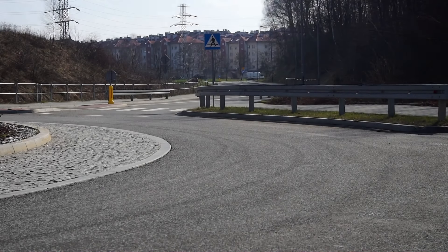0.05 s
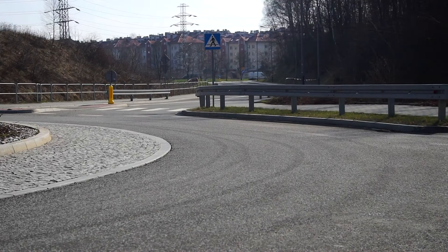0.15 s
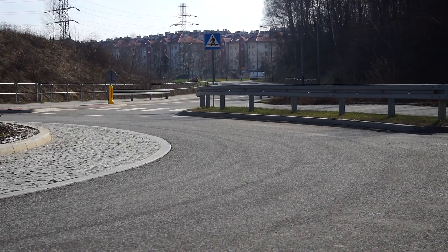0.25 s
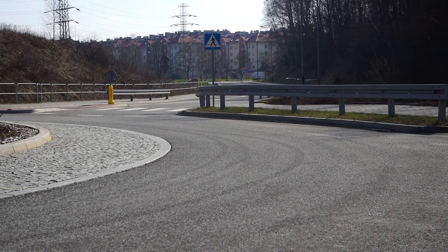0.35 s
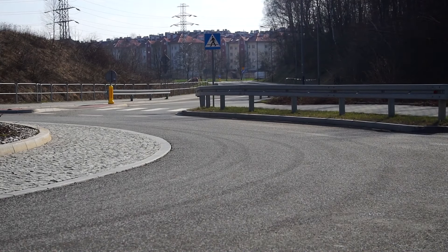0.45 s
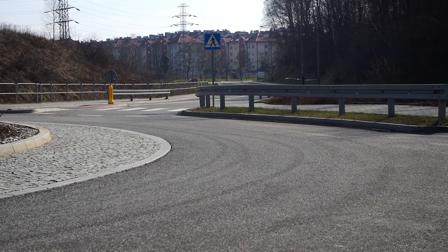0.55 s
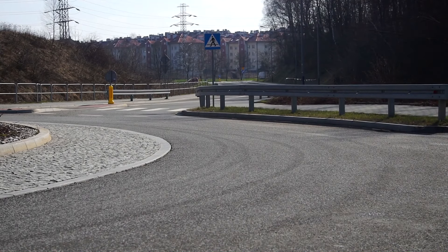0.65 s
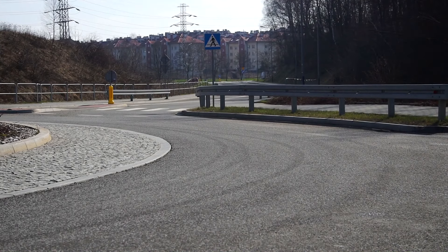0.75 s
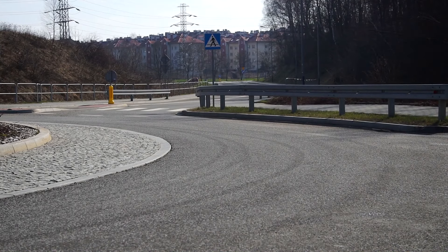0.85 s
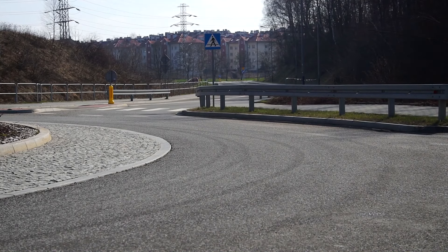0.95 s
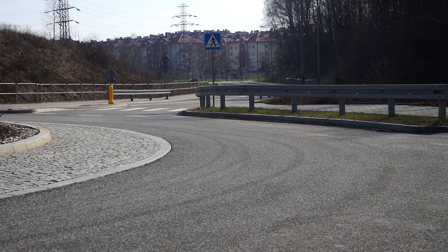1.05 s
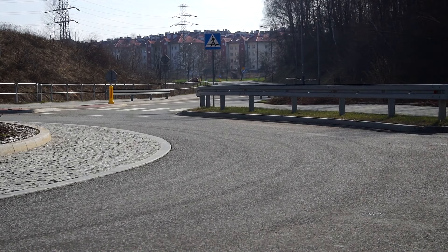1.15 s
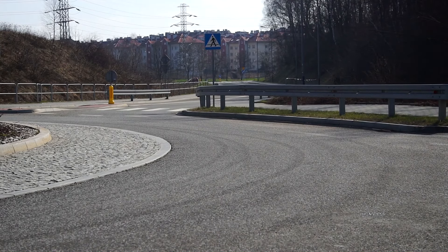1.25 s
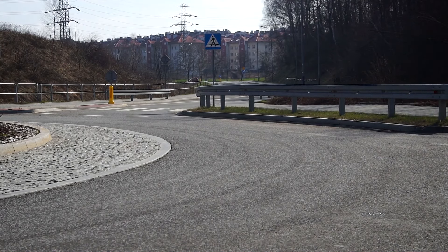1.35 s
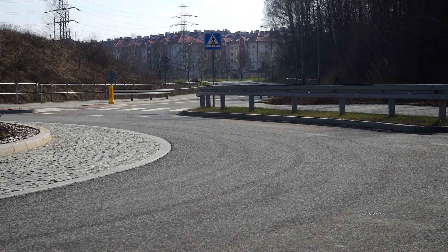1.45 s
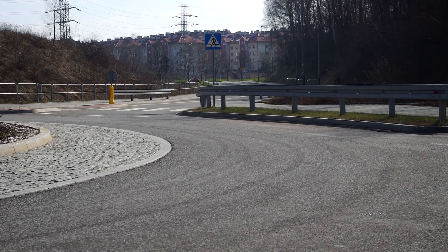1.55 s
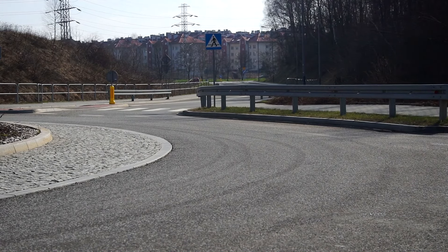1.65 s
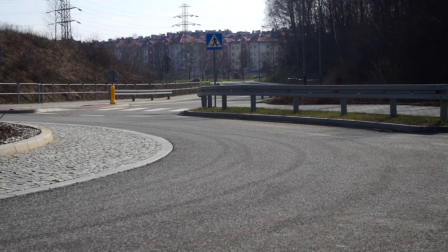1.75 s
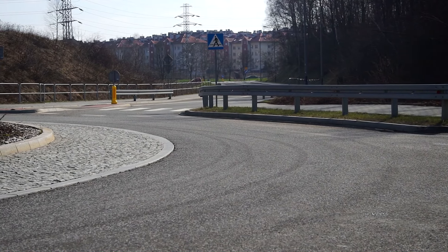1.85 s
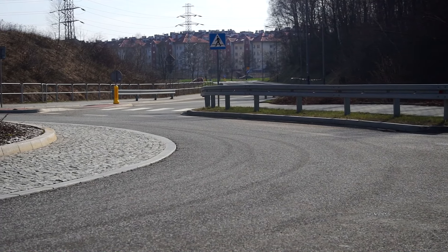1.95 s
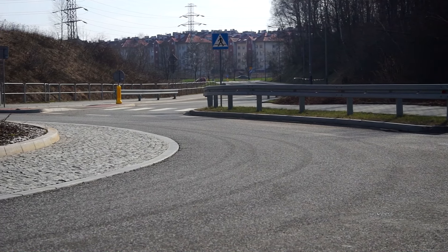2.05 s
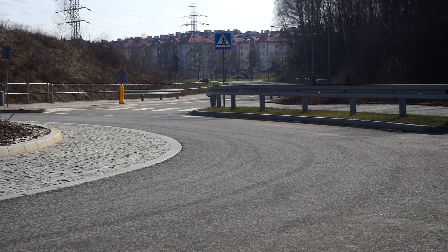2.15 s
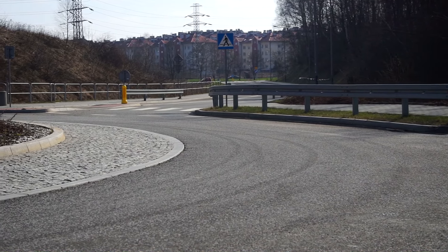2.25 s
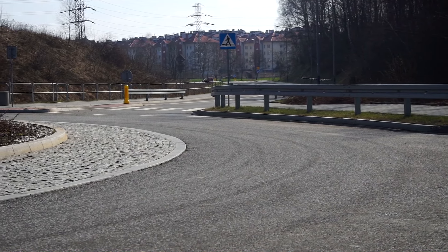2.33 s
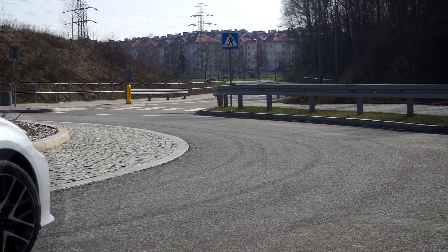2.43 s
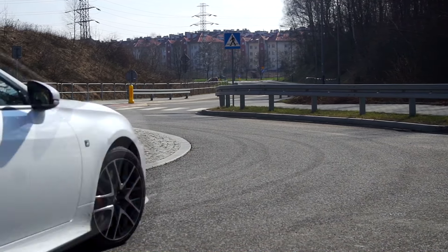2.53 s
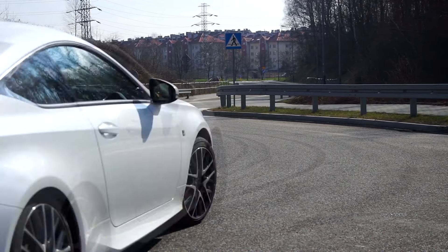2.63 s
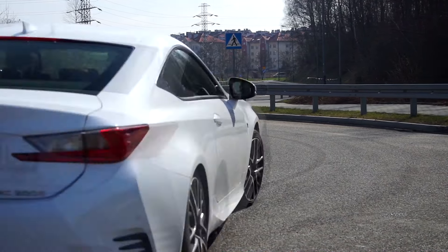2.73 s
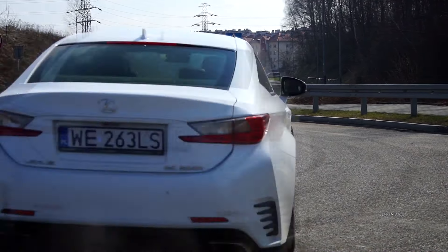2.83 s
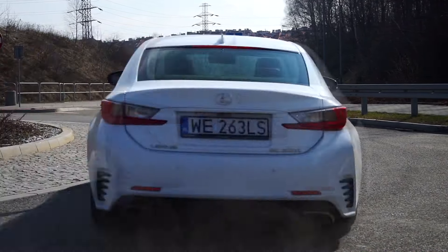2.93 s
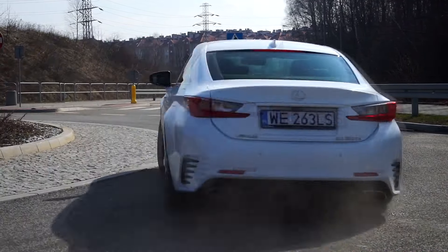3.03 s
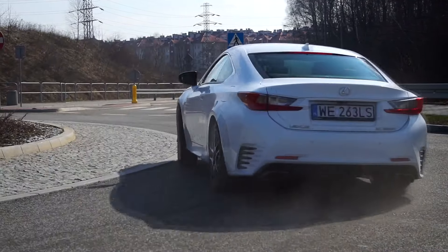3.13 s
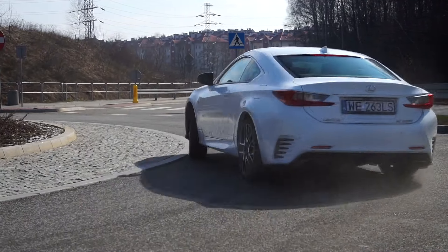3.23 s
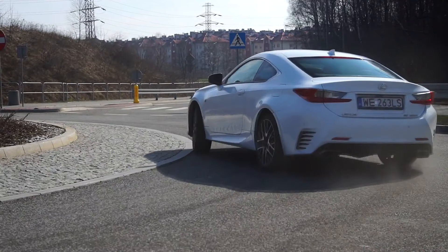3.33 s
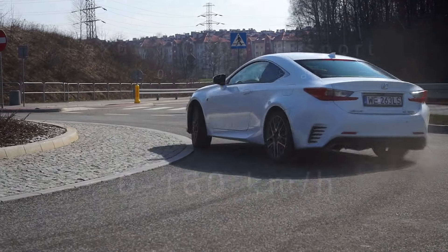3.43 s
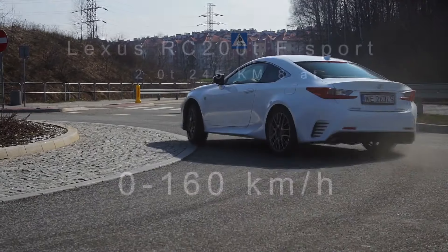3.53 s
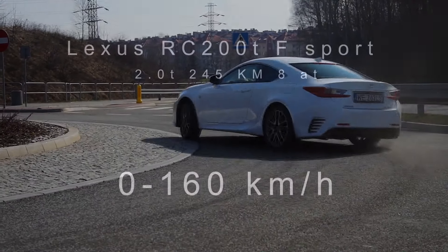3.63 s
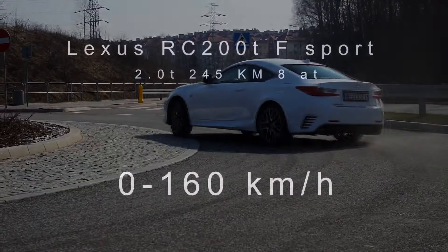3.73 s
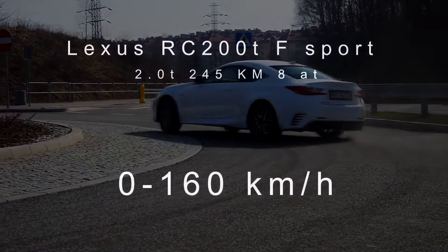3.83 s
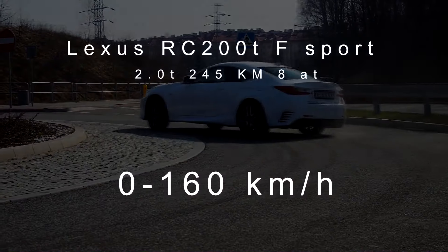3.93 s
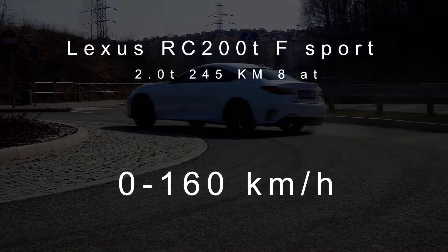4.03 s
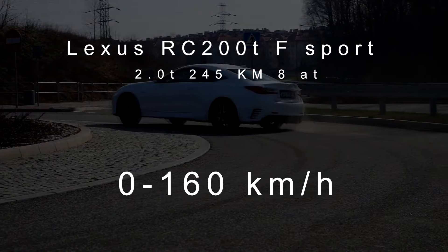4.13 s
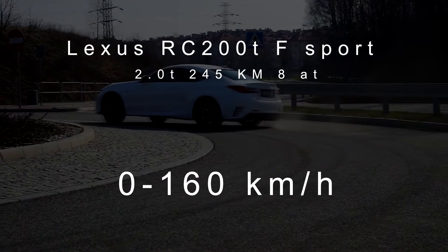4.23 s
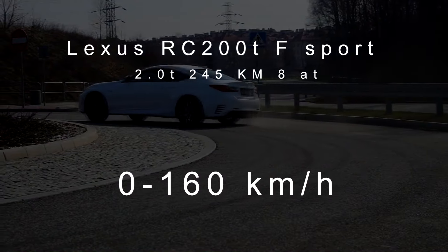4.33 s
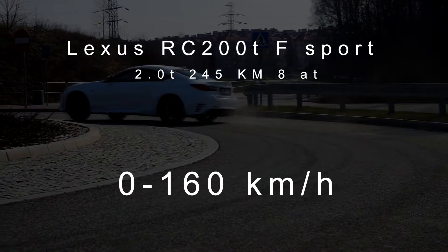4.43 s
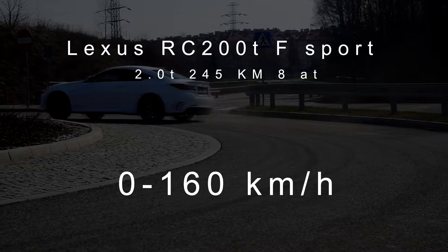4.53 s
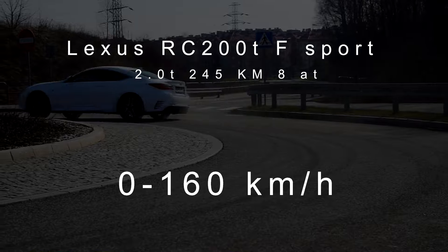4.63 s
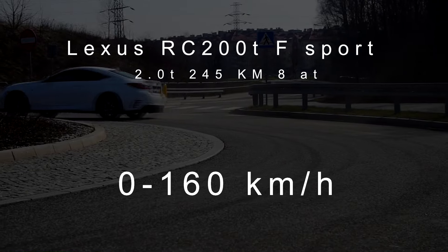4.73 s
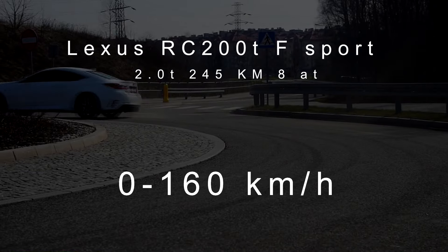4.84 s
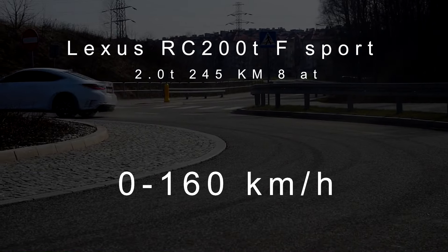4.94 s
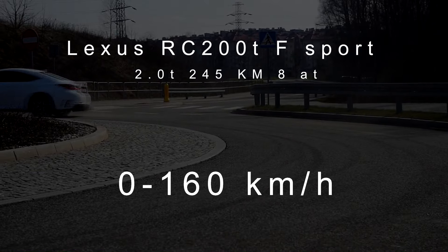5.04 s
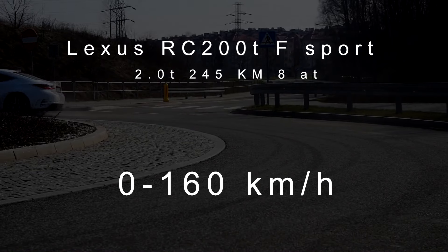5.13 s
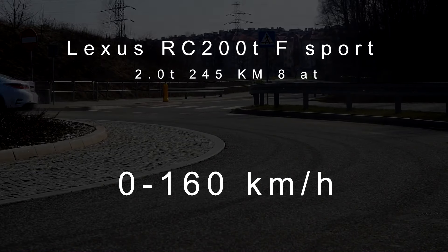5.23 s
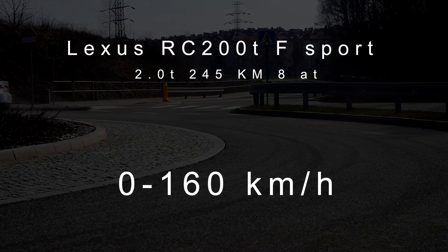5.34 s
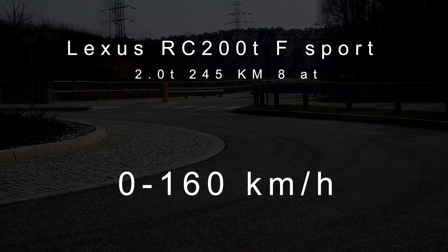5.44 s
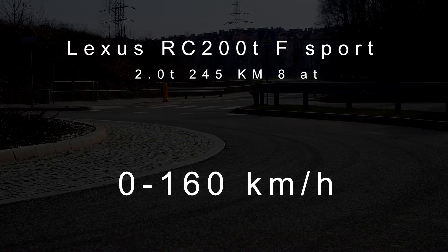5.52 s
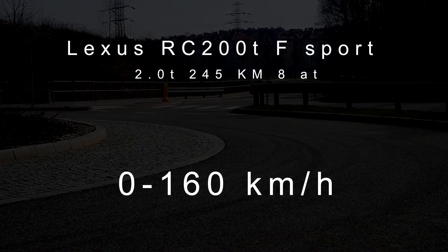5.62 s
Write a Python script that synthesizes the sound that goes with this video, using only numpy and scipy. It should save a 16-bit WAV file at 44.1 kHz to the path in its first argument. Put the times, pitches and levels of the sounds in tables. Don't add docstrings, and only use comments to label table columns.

```python
import sys
import numpy as np
from scipy import signal
from scipy.fft import rfft, irfft
from scipy.io import wavfile
from scipy.ndimage import uniform_filter1d

SR = 44100
rng = np.random.default_rng(int(sys.argv[2]) if len(sys.argv) > 2 else 0)


def master_out(mix):
    frames = np.transpose(np.atleast_2d(mix))
    ceiling = np.clip(frames, -1, 1)
    pcm = np.round(ceiling * 32767).astype(np.int16)
    wavfile.write(sys.argv[1], SR, pcm)


def gain_from_db(level_db):
    decades = np.asarray(level_db, float) / 20
    return 10 ** decades


N = 250297

# time_s, bearing (0 left of the microphone, 1 ahead)
BEARING = [(0, 0.11), (2.4, 0.009), (2.7, 0.83), (3.2, 1), (5.68, 0.9)]


def evened(x):
    return x / np.sqrt(np.mean(abs(x) ** 2) + 1e-20)


def read(points, hz):
    f, value = np.transpose(points)
    return np.interp(np.log(hz + 1), np.log(f + 1), value)


def follow(rows):
    s, *columns = np.transpose(rows)
    t = np.arange(N) / SR
    gate = np.clip(np.minimum(t - s[0] + .03, s[-1] + .03 - t) / .03, 0, 1)
    return [np.interp(t, s, c) for c in columns] + [gate]


def peaks(times, widths_s, fall):
    t = (np.arange(N) / SR - np.reshape(times, (-1, 1))) / np.reshape(widths_s, (-1, 1))
    return np.minimum(t, -t / fall)


def wander(speed_hz):
    z = rfft(rng.standard_normal(N))
    return evened(irfft(z / (1 + (np.fft.rfftfreq(N, 1 / SR) / speed_hz) ** 4), N))


def noise(spectrum, patchy_db, flicker_db):
    frames, hz = N // 128 + 5, np.fft.rfftfreq(512, 1 / SR)
    a, b, patches = rng.standard_normal((frames, 257, 3)).T
    patches = uniform_filter1d(patches, size=6, axis=0)
    patches = evened(uniform_filter1d(patches, size=24, axis=1))
    flicker = evened(uniform_filter1d(rng.standard_normal(frames), size=20))
    level_db = read(spectrum, hz)[:, None] + patchy_db * patches + flicker_db * flicker
    z = (a + 1j * b) * gain_from_db(level_db)
    return evened(signal.istft(z, nperseg=512, noverlap=384)[1][:N])


def low_noise(spectrum):
    z = rfft(rng.standard_normal(N))
    return evened(irfft(z * gain_from_db(read(spectrum, np.fft.rfftfreq(N, 1 / SR))), N))


def tone(hz, wobble, speed_hz):
    return 2 * np.pi * (np.cumsum(hz * (1 + wobble * wander(speed_hz))) / SR + rng.random())


def motor_hum():
    # pitch_hz, level_db
    hum_lines = [(80.7, -62.5), (161.5, -59), (242.2, -68), (323.0, -67.5), (403.7, -81)]
    # time_s, level_db
    hum_swell = [(4.9, -38), (5.24, -4), (5.32, -1.5), (5.68, -3.5)]
    swell_db, on = follow(hum_swell)
    t = np.arange(N) / SR
    lines = sum(np.sqrt(2) * gain_from_db(db) * np.sin(2 * np.pi * hz * t) for hz, db in hum_lines)
    return on * gain_from_db(swell_db) * lines


def wind():
    # time_s, level_db
    breeze = [(4.35, -75.5), (4.42, -60.5), (5.0, -60.5), (5.3, -58), (5.36, -70), (5.6, -58), (5.67, -62)]
    # time_s, level_db, rise_s
    gusts = [(4.399, -59, 0.029), (4.48, -54, 0.03), (4.57, -55.5, 0.036), (4.65, -57, 0.027),
             (4.75, -56, 0.055), (4.88, -49.5, .03), (4.95, -49, 0.044), (5.02, -49, .03),
             (5.09, -46.5, 0.033), (5.2, -46, 0.037), (5.28, -48, .025)]
    # frequency_hz, density_db
    wind_spectrum = [(15, -30.5), (25, -6), (59, 4), (167, 0.5), (330, -11.5), (569, -28), (600, -47),
                     (780, -65), (1320, -120)]
    calm_db, gate = follow(breeze)
    s, top_db, rise_s = np.transpose(gusts)
    gust_db = (top_db[:, None] + 6 * peaks(s, rise_s, fall=1.9)).max(axis=0)
    db = np.maximum(calm_db, gust_db)
    lumps = gate * gain_from_db(db + 0.5) * evened(gain_from_db(1.94 * wander(40)))
    each_port = np.array([low_noise(wind_spectrum), low_noise(wind_spectrum)])
    return lumps * (low_noise(wind_spectrum) + gain_from_db(-11) * each_port)


def engine():
    # time_s, firing_hz, level_db
    firing = [(0, 177.5, -44), (.2, 183.3, -45.5), (.35, 196.4, -45), (.47, 204.5, -49), (.6, 206.3, -53.5),
              (.82, 187.2, -56.5), (1.15, 200, -60), (1.43, 205.6, -56.5), (1.9, 165.2, -66),
              (2.3, 164.1, -64.5)]
    minor_orders = [(2, -17), (3.5, -3)]
    # pitch_hz, level_db
    drone = [(48.4, -52.5), (91.5, -52.5)]
    # time_s, level_db
    drone_fade = [(0, 1.5), (.4, 5), (.55, -9.5), (1.0, -18.5), (1.5, -27), (2.0, -34)]
    # time_s, second_order_hz, level_db
    away = [(3.2, 371.8, -58), (3.24, 385, -85.5), (3.288, 348.6, -71.5), (3.848, 378, -67),
            (3.952, 369, -71), (4.05, 411, -73)]
    t = np.arange(N) / SR
    hz, db, gate = follow(firing)
    phase = tone(hz, .004, 20)
    off = (3 * hz - 592) / 36.5
    third_db = db + 2 - 10 * np.log10(1 + off ** 4) - 17 * np.maximum(t - 0.43, 0)
    out = gain_from_db(db) * np.cos(phase) + gain_from_db(third_db) * np.cos(3 * phase)
    out += gain_from_db(db - 11) * np.cos(5 / 2 * phase)
    out = gate * (out + sum(gain_from_db(db + d) * np.cos(k * phase) for k, d in minor_orders))
    fade_db, on = follow(drone_fade)
    for f, d in drone:
        out += on * gain_from_db(d + fade_db + 0.39 * wander(12)) * np.cos(tone(f, 0.038, 9.6))
    hz, db, gate = follow(away)
    return np.sqrt(2) * (out + gate * gain_from_db(db) * np.cos(tone(hz, 0.0025, 14.1)))


def underbody(lift_db, spread_db):
    # frequency_hz, density_db
    rumble = [(15, -53), (25, -29), (32, -37), (46, -8), (86, -1), (171, -5.5), (204, 6.5), (250, -4),
              (369, -8), (420, -4.5), (550, -31.5), (920, -120)]
    # frequency_hz, density_db
    belly = [(220, -32), (330, -6), (450, -3), (560, 3.5), (680, 11), (760, 12.5), (900, -27),
             (4000, -88.5)]
    rumble_db = -37 + lift_db + 0.39 * spread_db
    belly_db = -24 + 0.77 * lift_db + 0.89 * spread_db
    return gain_from_db(rumble_db) * low_noise(rumble) + gain_from_db(belly_db) * low_noise(belly)


def grit():
    # frequency_hz, density_db
    grit_spectra = [
        [(2710, -28), (4600, 3.5), (4890, 0), (7420, -1.5), (11600, -6), (14800, -8.5), (15500, -26)],
        [(2710, -18.5), (4600, -1.5), (5610, -3), (6470, -12), (8870, -8.5), (9530, -9.5), (13400, -6),
         (15500, -9.5)],
        [(2710, -9.5), (4600, 0.5), (5070, -5.5), (5470, 0.5), (5900, -2.5), (7090, 2), (8350, -9.5),
         (10100, -2.5), (11600, -12), (12700, -8.5), (15500, -18)],
        [(2710, -44), (4600, -8), (5150, -6), (6200, -9), (7270, -7), (8500, -21.5), (10100, -14), (11700, -26),
         (12900, -20), (14200, -31), (15500, -41)],
    ]
    place = np.interp(np.arange(N) / SR, [2.2, 2.45, 2.8, 3.0, 4.0, 4.25], [0, 1, 1, 2, 2, 3])
    crackle = evened(gain_from_db(1.0 * wander(600) + 1.43 * wander(21)))
    hiss = np.zeros(N)
    for k, spectrum in enumerate(grit_spectra):
        hiss += np.sqrt(np.clip(1 - abs(place - k), 0, 1)) * noise(spectrum, 1.2, 0.23)
    return crackle * hiss


def road():
    # time_s, scrubbing_effort_db, distance_m
    car_course = [(0, -48.5, 15), (.41, -39.5, 10.3), (.7, -42.5, 13.4), (.85, -49, 8.6), (1.3, -47, 11.66),
                  (1.9, -49, 9.5), (2.25, -49.5, 8.06), (2.67, -50.5, 3.33), (3.0, -48, 12.4),
                  (3.27, -44, 10.45), (3.48, -43, 11.56), (3.75, -46.5, 10.7), (4.04, -46.5, 9),
                  (4.1, -50.5, 14), (4.14, -48.5, 16.7), (4.44, -55, 15.1), (4.48, -50.5, 20.1),
                  (4.56, -57, 20.7), (4.8, -61, 22.1), (5.2, -61, 25.2), (5.4, -69.5, 33),
                  (5.67, -79.5, 89)]
    # time_s, level_db
    sprays = [(.01, 3.5), (.41, 0), (.52, 2), (.76, 2), (1.1, 6.5), (2.6, 3), (2.74, 1.5), (2.88, 5.5),
              (3.27, 4), (3.6, 1), (3.72, -2), (4.04, -5.5), (4.26, 2.5), (4.66, 4), (4.77, 9), (4.9, 7.5),
              (5.0, 6.5), (5.13, 6), (5.22, 6), (5.3, 1), (5.38, 2)]
    # frequency_hz, density_db
    roar = [(550, -14), (700, -28.5), (800, 20), (1000, 12.5), (1250, 6.5), (1600, 11), (2000, 0),
            (2300, -12), (2600, -49), (5000, -84)]
    # frequency_hz, density_db
    scrub = [(1700, -42), (2050, -2), (2250, 9), (2600, 7), (3300, 6), (4200, 1), (4800, -19.5),
             (6000, -43), (9000, -77.5)]
    t = np.arange(N) / SR
    effort_db, far_m, _ = follow(car_course)
    extra_db = effort_db + 50
    s, db = np.transpose(sprays)
    spray_db = db @ np.exp(peaks(s, 0.037, fall=1.0))
    tail_db = 5.5 * np.exp(-((t - 3.034) / 0.2) ** 2)
    lift_db = np.clip(19.5 * (0.33 - t), -20, 0) + tail_db
    spread_db = -20 * np.log10(np.maximum(far_m, 1))
    roar_db = -42.6 + 0.99 * extra_db + 0.16 * spray_db + 0.19 * lift_db
    roar_db += -0.5 * follow(BEARING)[0] + 0.282 * np.minimum(far_m, 20)
    grit_db = -45 + 0.76 * extra_db - 1.255 * far_m + spray_db
    out = underbody(lift_db, spread_db) + gain_from_db(roar_db) * noise(roar, 1.96, 0.2)
    out += gain_from_db(effort_db + 0.69 * spray_db) * noise(scrub, 2.2, .7)
    return out + gain_from_db(grit_db) * grit()


def stones():
    # time_s, level_db
    strikes = [
        (1.206, -44),
        (3.3684, -46),
        (3.5678, -49),
    ]
    out, t = np.zeros(N), np.arange(400) / SR
    for s, db in strikes:
        at = round(s * SR)
        ring = gain_from_db(db - 60 * t / .004) * np.sin(2 * np.pi * 9000 * t)
        out[at:at + len(t)] += ring * rng.standard_normal(len(t))
    return out


def catches(rows):
    start, length, from_hz, to_hz, db = np.transpose(rows)[:, :, None]
    t = np.arange(0, N / SR + .01, .005)
    ends_s = np.hstack([start, start + length]).ravel()
    hz = np.interp(t, ends_s, np.hstack([from_hz, to_hz]).ravel())
    sag_db = -2 * np.clip((t - start) / length, 0, 1)
    before_db = 285.5 * np.maximum(start - t, 0)
    after_db = 217 * np.maximum(t - start - length, 0)
    level_db = (db + sag_db - before_db - after_db).max(axis=0)
    return np.transpose([t, hz, level_db])


def skips():
    # time_s, depth_db
    dips = [(.195, -14), (.236, -13), (.3, -6), (.371, -21.5), (0.642, 1), (0.964, -5), (1.032, 5),
            (1.381, 0), (1.668, -3), (1.863, -10), (2.073, -10), (2.131, -4), (2.318, -5), (2.368, -6),
            (2.745, -8), (2.877, -3.5), (2.902, -5), (2.938, -9), (3.333, -27), (3.414, -11), (3.432, -19),
            (4.032, -15), (4.077, -18), (4.309, -6.5), (4.371, -17), (4.398, -7), (4.636, -10), (4.715, -3),
            (4.804, -8), (4.9, -6), (4.992, -11), (5.076, -12), (5.19, -12), (5.341, -13), (5.49, -13.5),
            (5.597, -21)]
    s, db = np.transpose(dips)
    t = np.arange(0, N / SR + .01, .001)
    dip_db = db @ np.exp(-((t - s[:, None]) / 0.0052) ** 2)
    return np.interp(np.arange(N) / SR, t, dip_db)


def overtones(hz):
    # time_s, slipping share of each cycle (0-1), release_snap_db
    slip_course = [(0, 0.34, -5.5), (.1, 0.37, -7), (.25, 0.32, -6), (.4, 0.35, -2.5), (.6, 0.33, -0.5),
                   (1.0, 0.36, 1.5), (1.11, 0.33, -1), (1.16, 0.39, -3), (1.3, 0.34, -7),
                   (1.85, 0.35, -1.5), (2.15, 0.41, -2.5), (2.27, 0.46, -9), (2.42, 0.48, 0),
                   (2.6, 0.45, -3.5), (2.68, 0.44, 4), (2.76, 0.42, 4), (2.86, 0.39, 1.5),
                   (3.0, 0.41, -0.5), (3.3, 0.41, 5.5), (3.6, 0.39, 1), (3.9, 0.4, -1), (4.1, .39, -1.5),
                   (4.3, 0.4, -1.5), (4.55, 0.38, -2.5), (5.1, 0.38, -12), (5.67, 0.38, -16.5)]
    slip, snap_db, _ = follow(slip_course)
    edge_db = snap_db - 0.5 * np.maximum(hz - 830, 0)
    levels_db = []
    for k, db in [(2, -35.5), (3, -45), (4, -66.5)]:
        levels_db.append(edge_db + db + 10 * np.log10(np.sin(k * np.pi * slip) ** 2 + 0.0035))
    return levels_db


def tyre(rows, crowd_db, extra_snap_db, ceiling_db):
    # time_s, phase_rad
    smear = [(0, 0.11), (1.0, 0.11), (1.3, 0.27), (2.2, .2), (2.45, .26), (2.85, 0.42), (3.2, .25),
             (3.8, .25), (5.68, 0.21)]
    crowd_snap_db = (0, 3.5, 4.5, 4)
    hz, note_db, _ = follow(catches(rows))
    levels_db = [note_db] + [db + extra_snap_db for db in overtones(hz)]
    loose = np.clip((-29 - note_db) / 7, 0, 1)
    crowd_db = crowd_db - 5 * (1 - loose)
    blur, skip_db = follow(smear)[0], skips()
    out = np.zeros(N)
    patches = [(1, 1, .009, 24, .9), (crowd_db, 1.07, .02, 40, 3.0),
               (crowd_db, .94, .02, 40, 3.0), (crowd_db, 1.01, .07, 70, 3.0)]
    for db, detune, wobble, speed_hz, grip_db in patches:
        phase = tone(hz * detune, wobble * (0.593 + (1 - 0.593) * loose), speed_hz)
        db = db - 2.5 * np.maximum(loose, .15) * np.maximum(wander(9.1) - .4, 0)
        for k, level_db in enumerate(levels_db):
            catch_db = db + np.minimum(level_db, note_db + ceiling_db[k])
            catch_db = catch_db + grip_db * wander(83) + crowd_snap_db[k] * (detune != 1)
            gain = gain_from_db(catch_db + skip_db / (k + 1) ** 2)
            out += gain * np.cos((k + 1) * phase + blur * k * wander(90))
    return np.sqrt(2) * out


def inner_tyre():
    # start_s, length_s, start_pitch_hz, end_pitch_hz, level_db
    inner_catches = [(0, 0.11, 792.3, 798, -37), (.11, 0.11, 783.5, 807.4, -31.5),
                     (.24, 0.13, 795, 822, -30.5), (.42, 0.074, 814.4, 820.5, -43),
                     (.56, 0.16, 813, 825, -37), (.74, 0.2, 803, 790.5, -42.5),
                     (.94, 0.15, 795, 792, -38.5), (1.17, 0.25, 807.5, 795, -35.5),
                     (1.42, 0.13, 803.5, 797, -36), (1.58, 0.15, 777, 791, -37.5),
                     (1.88, 0.13, 757, 773.7, -38), (2.02, .1, 786.6, 765.5, -34.5),
                     (2.14, 0.21, 798, 776.5, -30.5), (2.38, 0.27, 796, 772, -30.5),
                     (2.65, 0.18, 804, 770, -33.5), (2.86, 0.15, 790, 784, -39),
                     (3.03, 0.11, 824, 810, -34), (3.13, 0.17, 793.1, 771.5, -28.5),
                     (3.42, 0.79, 742, 765.7, -45), (4.2, 0.43, 771, 769, -42),
                     (4.65, 0.095, 770, 769.6, -45), (4.82, 0.22, 769.6, 780.4, -44.5),
                     (5.12, 0.24, 776, 813, -48.5), (5.4, 0.18, 805.6, 822.5, -54)]
    inner_tops_db = (0, 14.5, 9, -15)
    return tyre(inner_catches, -10.5, 0, inner_tops_db)


def outer_tyre():
    # start_s, length_s, start_pitch_hz, end_pitch_hz, level_db
    outer_catches = [(0, 0.17, 886, 889, -53), (.18, 0.16, 880, 897, -30), (.385, 0.08, 915, 935.7, -24.5),
                     (.47, 0.046, 939.8, 950.1, -29), (.56, 0.077, 940, 900, -36),
                     (.7, 0.27, 885, 872.6, -32), (1.1, 0.087, 878, 873.5, -32.5),
                     (1.25, 0.36, 878, 871, -37.5), (1.65, 0.099, 860, 855, -37.5),
                     (1.8, 0.31, 835, 870.6, -35.5), (2.15, 0.16, 860, 870, -39.5),
                     (2.63, 0.11, 865, 862.8, -35.5), (2.8, 0.06, 845, 830, -32),
                     (2.87, 0.15, 852.6, 858, -32.5), (3.34, 0.069, 820, 795, -32),
                     (3.46, 0.22, 805, 798.6, -28.5), (3.68, 0.125, 812, 812, -25),
                     (3.82, 0.25, 825, 814.4, -25.5), (4.09, 0.27, 812, 808, -29.5),
                     (4.42, 0.17, 845, 852, -35.5), (4.64, 0.16, 850, 850.5, -39),
                     (4.82, 0.15, 862, 875, -43), (5.04, 0.2, 880, 869.5, -49), (5.3, 0.39, 888, 882, -57)]
    outer_tops_db = (-1.5, -7.5, -18.5, -30)
    # time_s, extra_snap_db
    outer_snap = [(0, 3), (.35, 6), (.6, 10), (.8, 19.5), (1.05, 8), (1.15, 25), (1.45, 22), (1.75, 4),
                  (1.9, -2.5), (2.3, 12), (2.7, 3), (3.0, -4), (5.68, -3)]
    return tyre(outer_catches, -9.0, follow(outer_snap)[0], outer_tops_db)


def travel(z, hz, t, ahead):
    # time_s, highest_carried_hz
    air_edge = [(5.12, 19890), (5.17, 6990), (5.22, 5900), (5.3, 5400), (5.4, 4930), (5.52, 4300),
                (5.68, 3800)]
    # time_s, first_cancelled_hz (odd multiples too), strength (0-1)
    sweep = [(1.9, 700, 0), (2.0, 670, 0.3), (2.15, 680, .3), (2.45, 660, 0.47), (2.581, 694.7, 0.29),
             (2.62, 1140, 0.65), (2.72, 1250, 0.23), (2.82, 1370, 0.73), (2.93, 1450, 0.03),
             (3.05, 1380, 0.28), (3.3, 1380, 0.07)]
    to_edge = hz[:, None] / np.interp(t, *np.transpose(air_edge))
    z = z * np.sqrt(0.42 ** 2 + 1 / (1 + to_edge ** 12))
    echo_band = np.exp(-((hz - 1364) / 87) ** 2)
    z = z * gain_from_db(np.outer(echo_band, -0.5 * (1 - ahead) - 16 * ahead))
    z = z * gain_from_db(3.5 * np.exp(-((to_edge - .9) / 0.077) ** 2))
    s, first_hz, strength = np.transpose(sweep)
    above_710_hz = 1 / (1 + (710 / (hz + 1)) ** 8)
    share = np.outer(above_710_hz, np.clip(np.interp(t, s, strength), 0, .9))
    return z * (1 - share * np.sin(np.pi / 2 * hz[:, None] / np.interp(t, s, first_hz)) ** 8)


def ports(x):
    # frequency_hz, left_minus_right_db
    left_db = [(60, 3), (110, -3.5), (200, 1.5), (380, 3.5), (700, 10.5), (1290, 19), (2380, 7.5),
               (4400, 12), (8120, -1.5), (15000, 30)]
    # frequency_hz, left_lead_rad
    left_rad = [(0, 0), (1210, -1.6), (1810, -3.7), (2840, -2.1), (3960, -2.8), (4480, -3.5), (6030, -2.1),
                (8440, -1.8), (9820, -0.7), (10600, -0.4), (11800, 0.6), (13200, 0.7), (13900, 2.4),
                (15200, 2.2)]
    # frequency_hz, left_minus_right_db
    ahead_db = [(60, -3), (110, 1.5), (200, 0.5), (380, 1), (700, 3.5), (1290, 0.5), (2380, -0.5),
                (4400, 2.5), (8120, -2.5), (15000, -0.5)]
    # frequency_hz, left_lead_rad
    ahead_rad = [(0, 0), (1290, -.7), (3400, -.4), (6000, -.6), (15000, -1.6)]
    # time_s, loss_db
    shade = [(4.1, 5), (4.45, 10), (4.7, 19), (5.0, 24), (5.3, 11), (5.68, 1)]
    # frequency_hz, level_db
    scatter_db = [(60, -35), (250, -6), (800, -11.5), (1500, -2), (3000, -6.5), (6000, 0.5), (9000, -3),
                  (13000, -1.5)]
    hz, t, z = signal.stft(x, SR, nperseg=512)
    ahead = np.clip(np.interp(t, *np.transpose(BEARING)), 0, 1)
    db = np.outer(read(left_db, hz), 1 - ahead) + np.outer(read(ahead_db, hz), ahead)
    db += np.outer(np.clip(hz / 4000 - 1, 0, 1), np.interp(t, *np.transpose(shade)))
    rad = np.outer(np.interp(hz, *np.transpose(left_rad)), 1 - ahead)
    rad += np.outer(np.interp(hz, *np.transpose(ahead_rad)), ahead)
    scatter = gain_from_db(read(scatter_db, hz))[:, None]
    ratio = gain_from_db(-db) / np.sqrt(1 + scatter ** 2)
    delay = np.exp(-1j * rad)
    left = 2 * travel(z, hz, t, ahead) / abs(1 + ratio * delay)
    late = np.roll(left, 9, axis=1)
    right = ratio * (left * delay + scatter * late)
    return signal.istft(np.array([left, right]), SR, nperseg=512)[1][:, :N]


def scene():
    car = engine() + road() + stones() + inner_tyre() + outer_tyre()
    hiss = gain_from_db(-94) * rng.standard_normal((2, N))
    return ports(car) + wind() + motor_hum() + hiss


def roll_off(x):
    return signal.sosfilt(signal.butter(12, 15780, fs=SR, output="sos"), x)


def record(dry):
    return roll_off(dry)


dry = scene()
out = record(dry)
master_out(out)
```